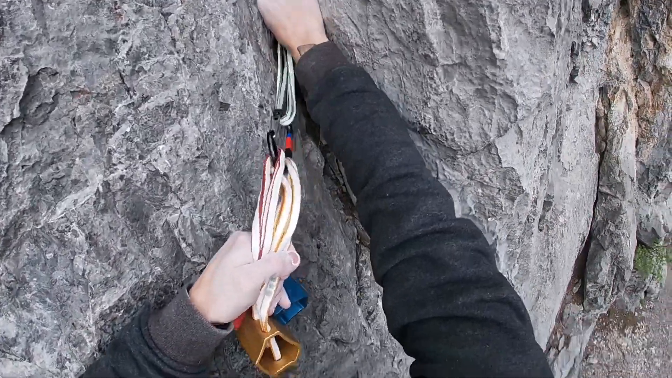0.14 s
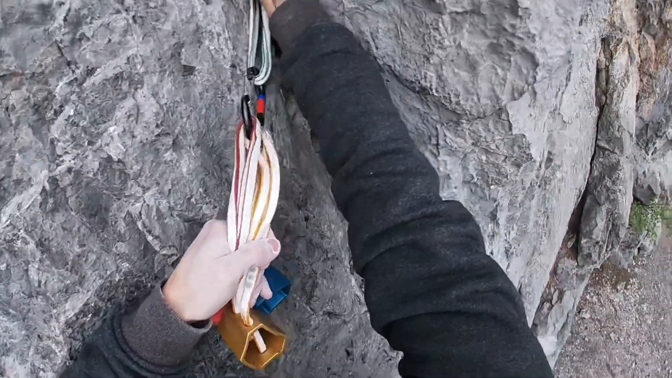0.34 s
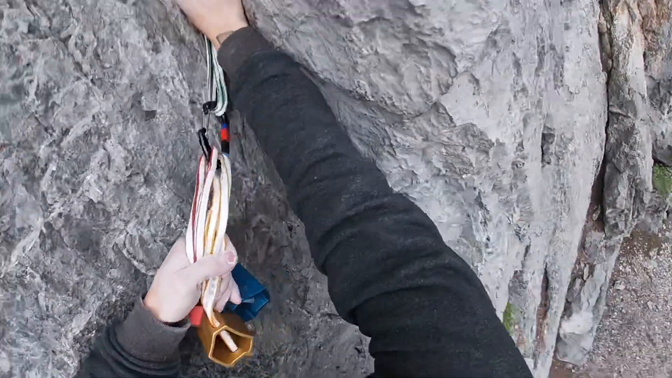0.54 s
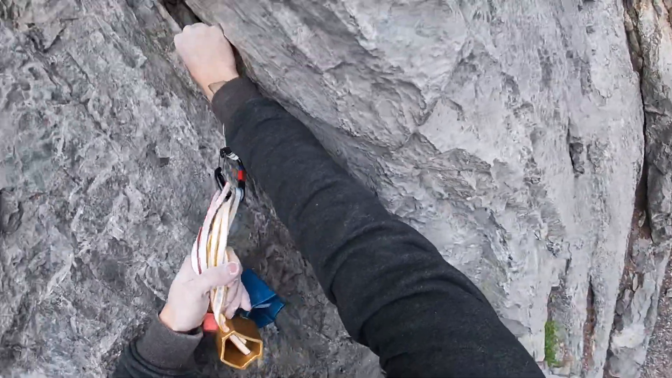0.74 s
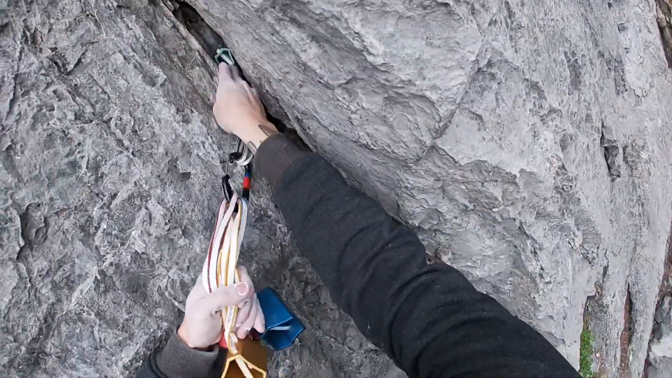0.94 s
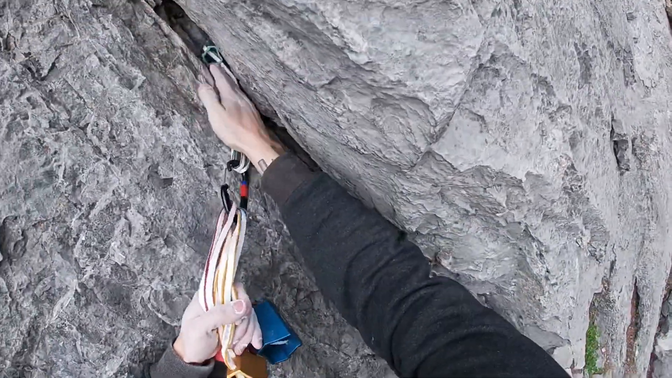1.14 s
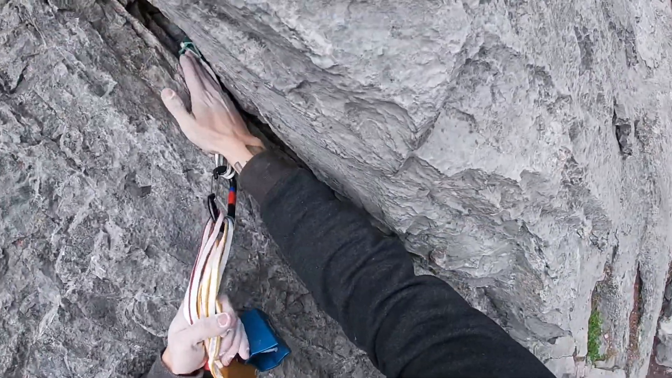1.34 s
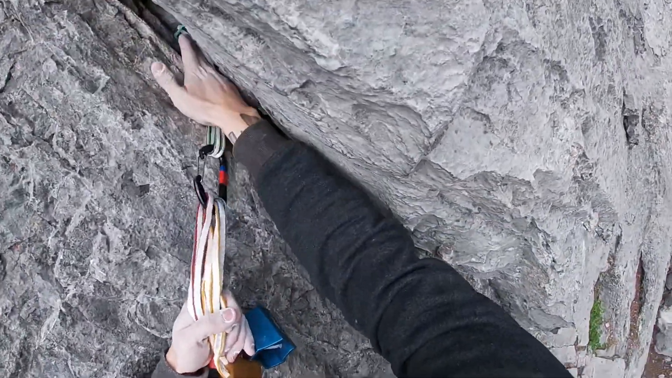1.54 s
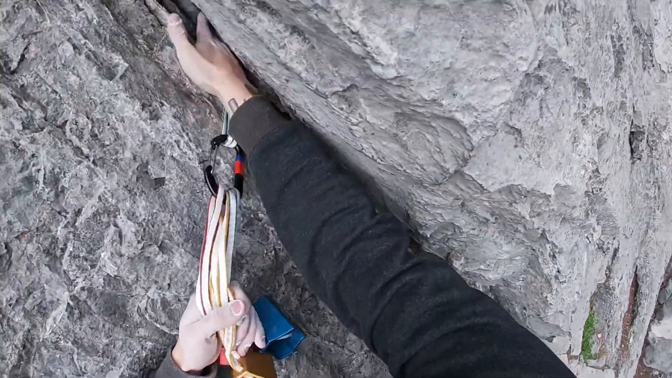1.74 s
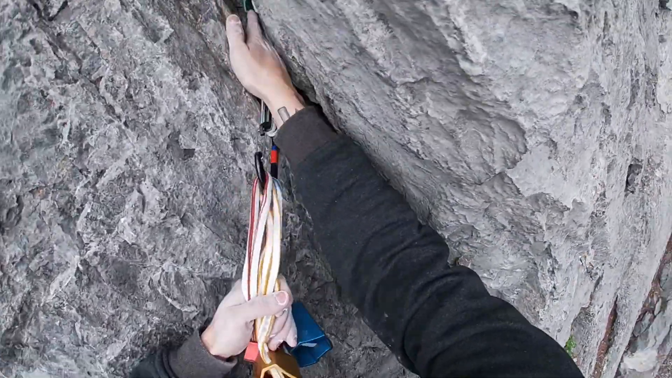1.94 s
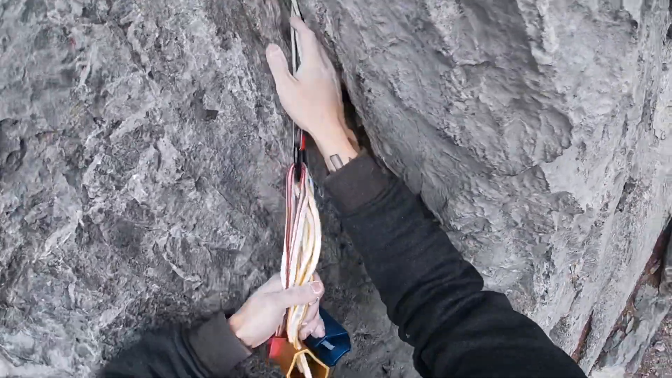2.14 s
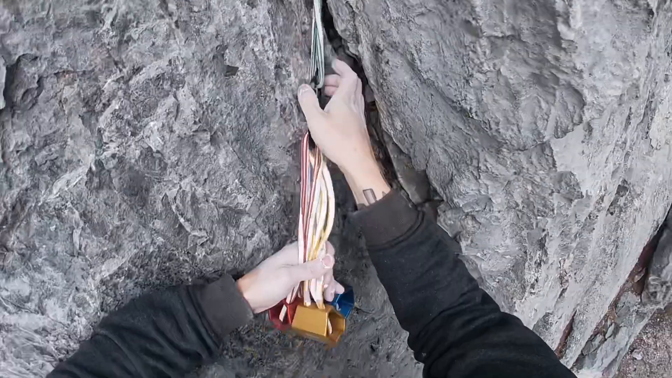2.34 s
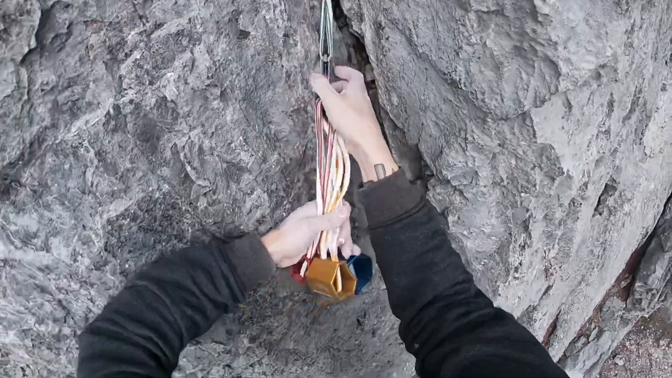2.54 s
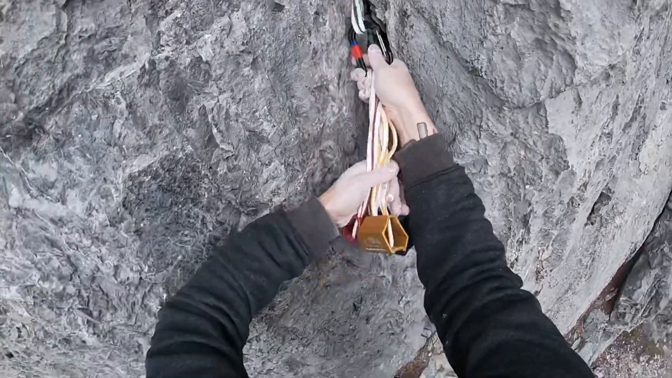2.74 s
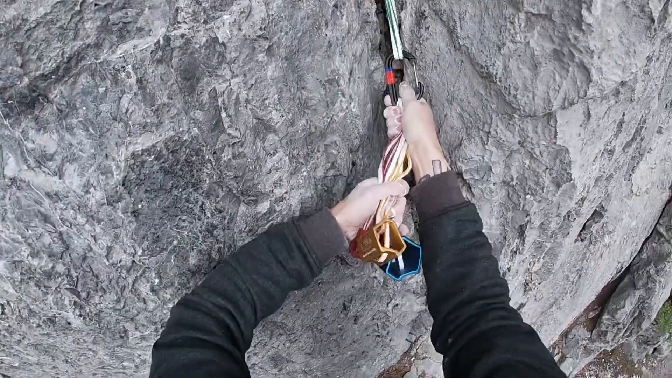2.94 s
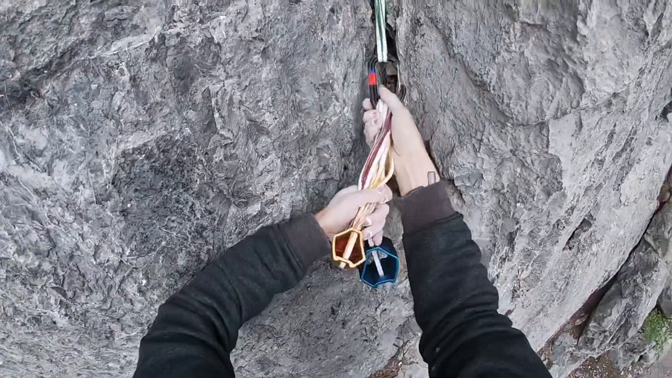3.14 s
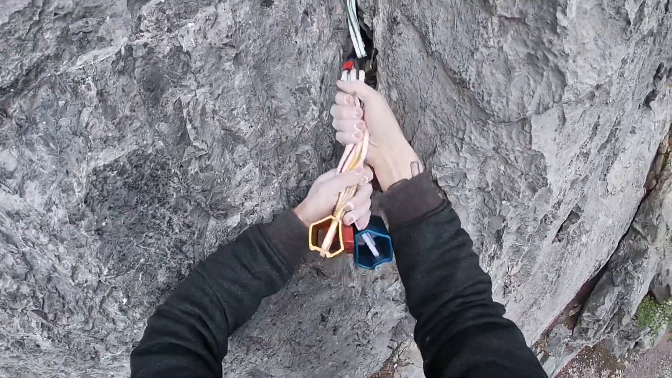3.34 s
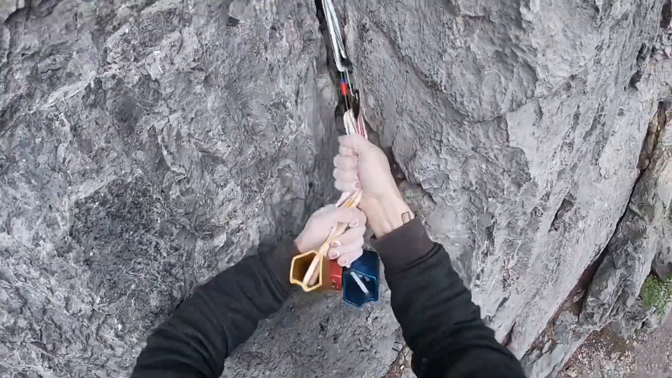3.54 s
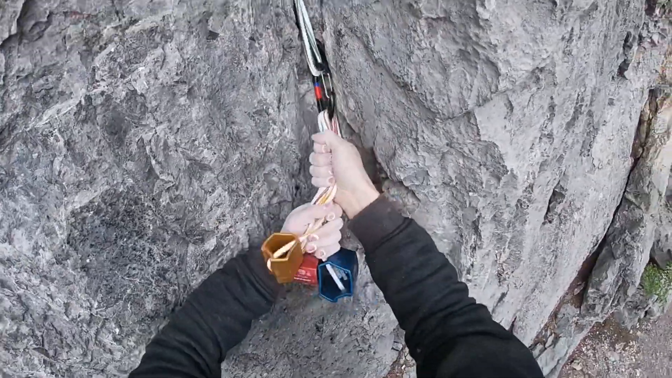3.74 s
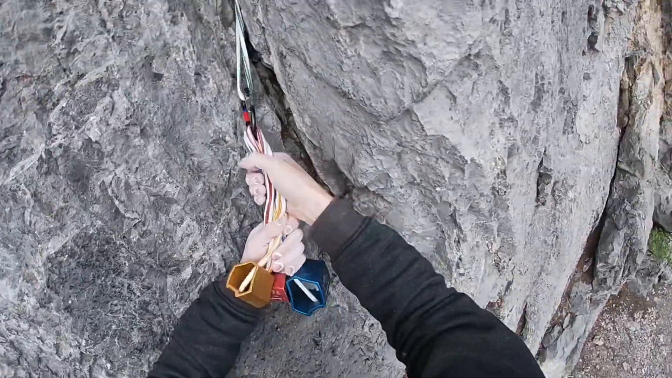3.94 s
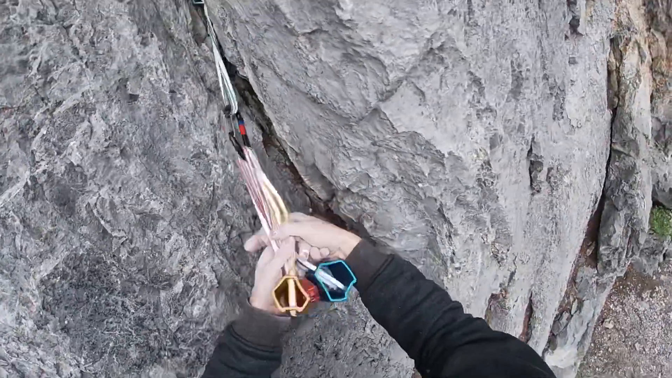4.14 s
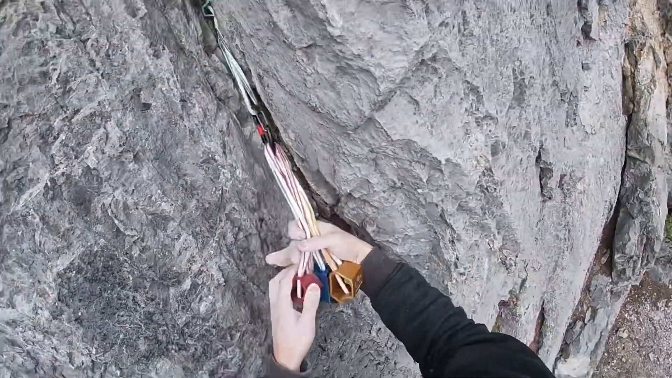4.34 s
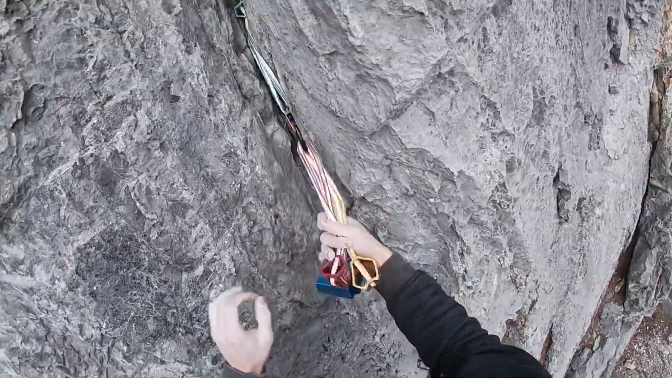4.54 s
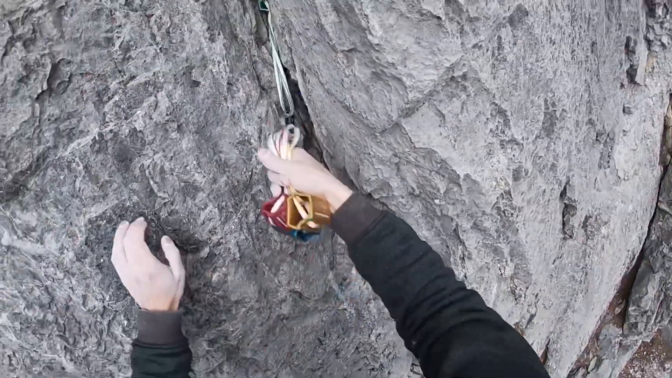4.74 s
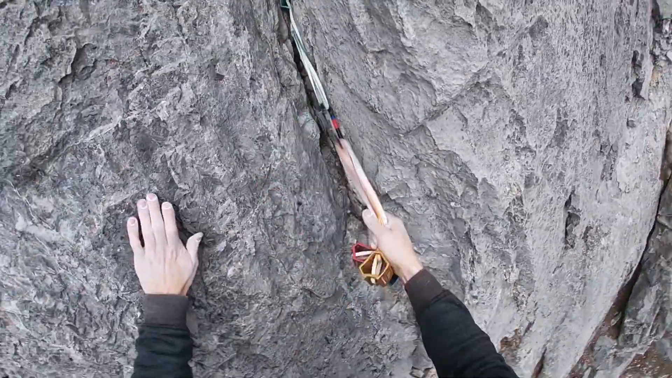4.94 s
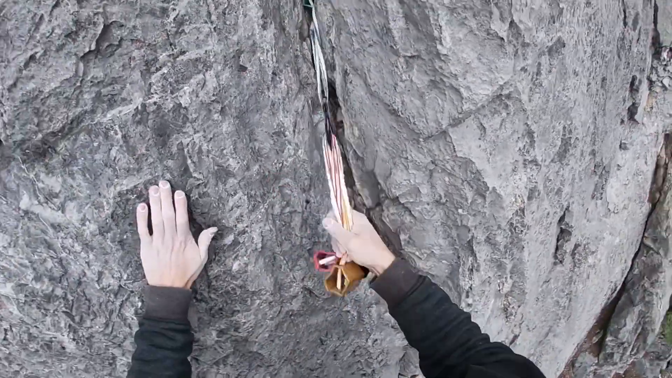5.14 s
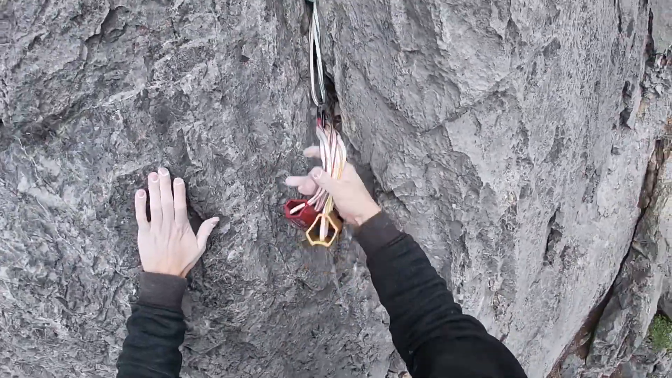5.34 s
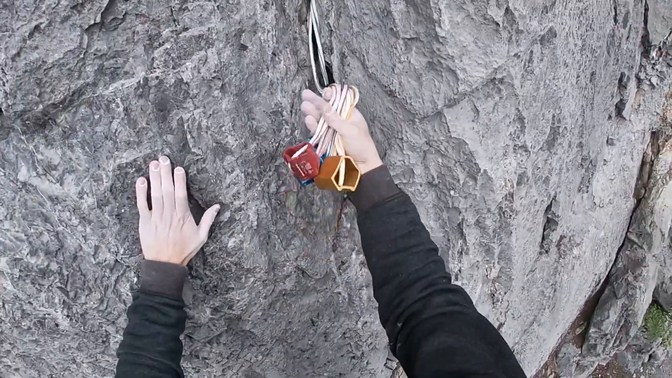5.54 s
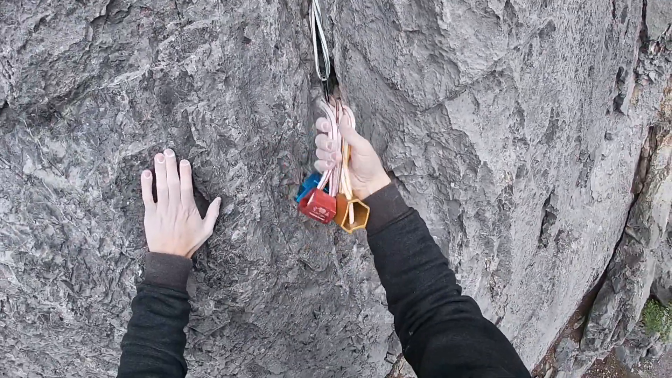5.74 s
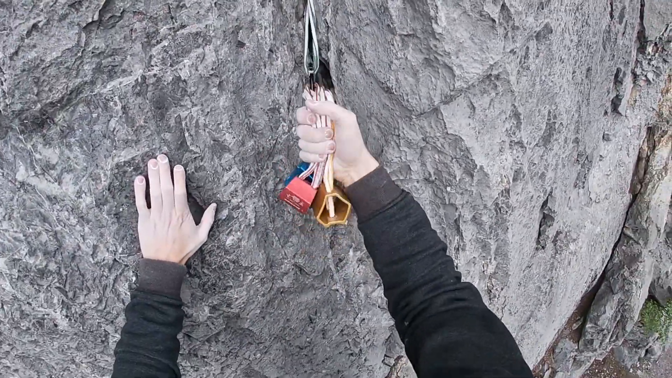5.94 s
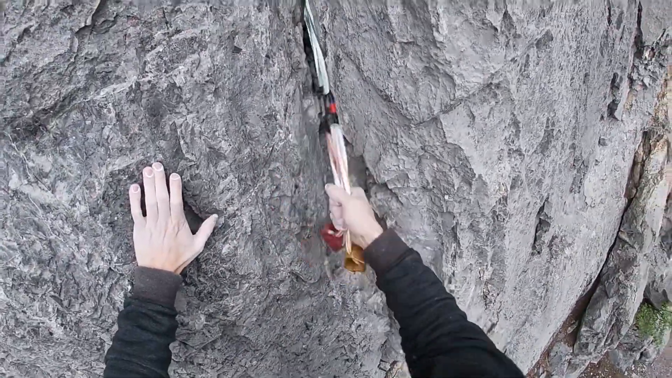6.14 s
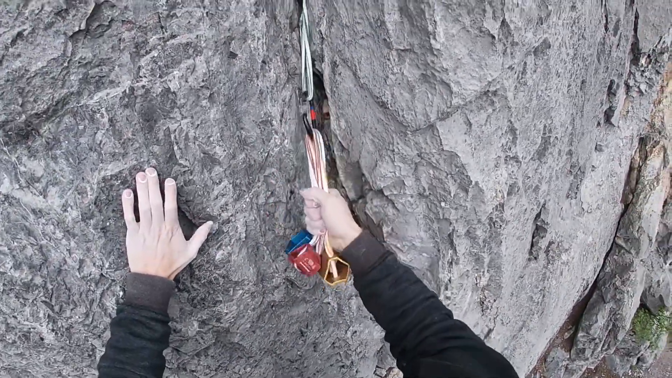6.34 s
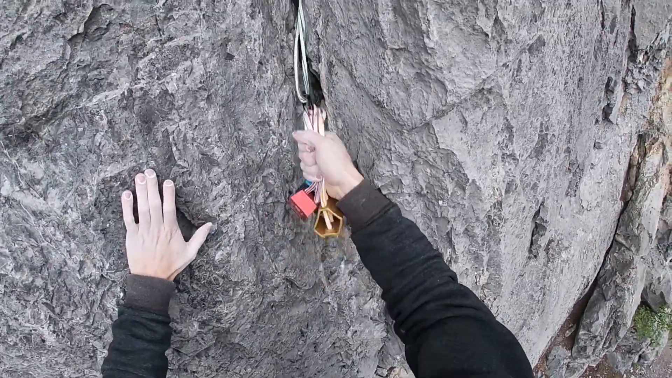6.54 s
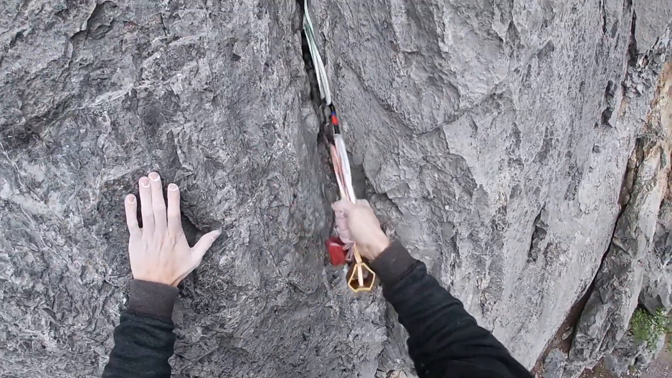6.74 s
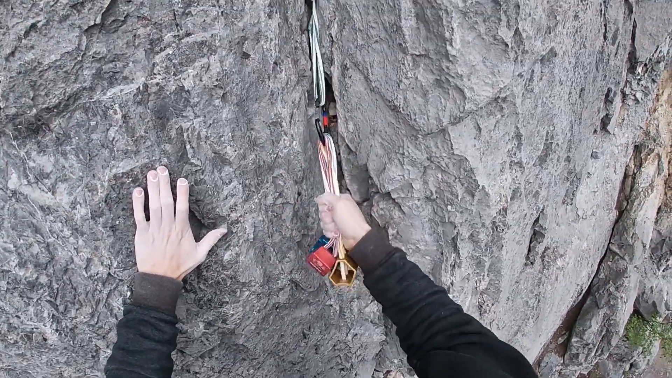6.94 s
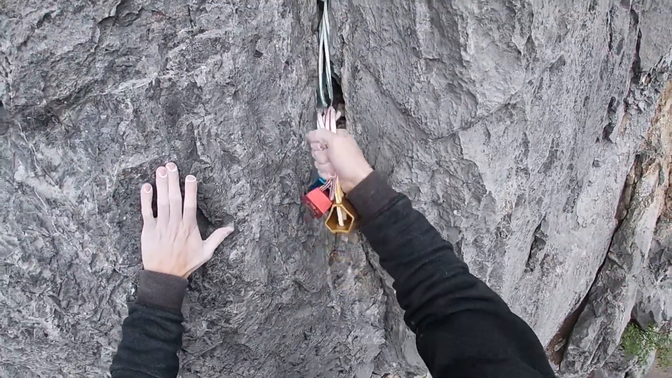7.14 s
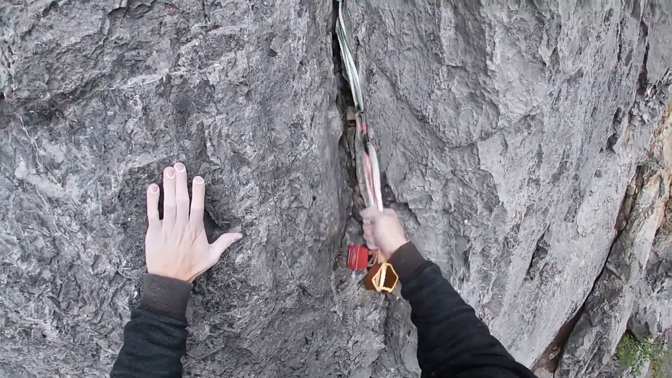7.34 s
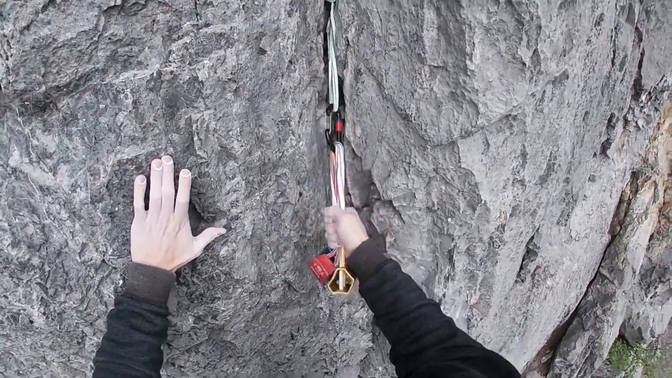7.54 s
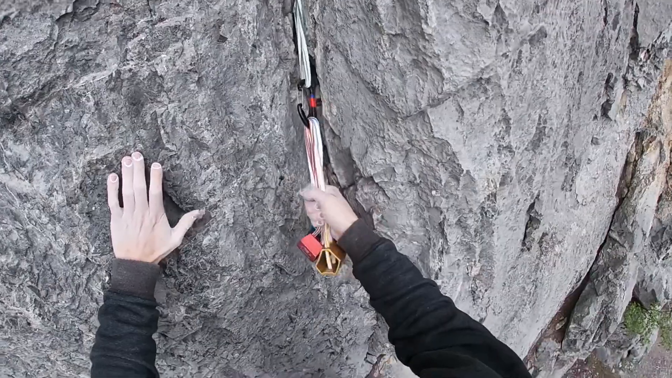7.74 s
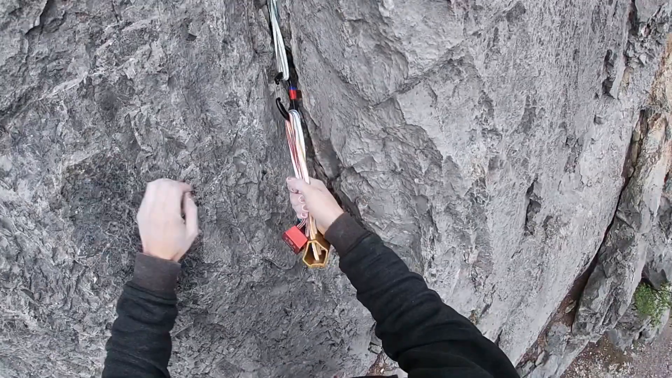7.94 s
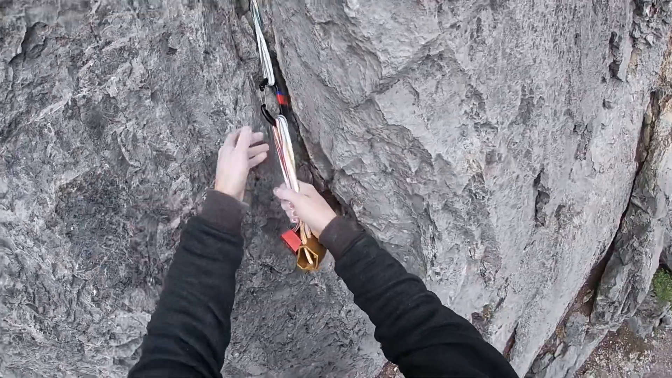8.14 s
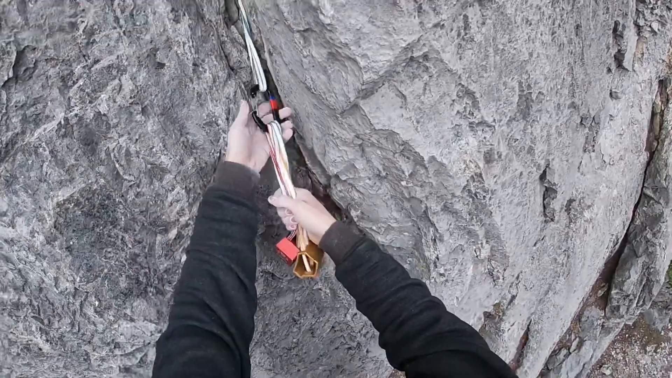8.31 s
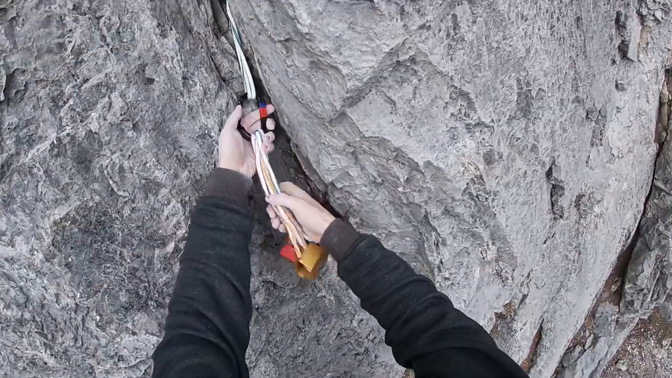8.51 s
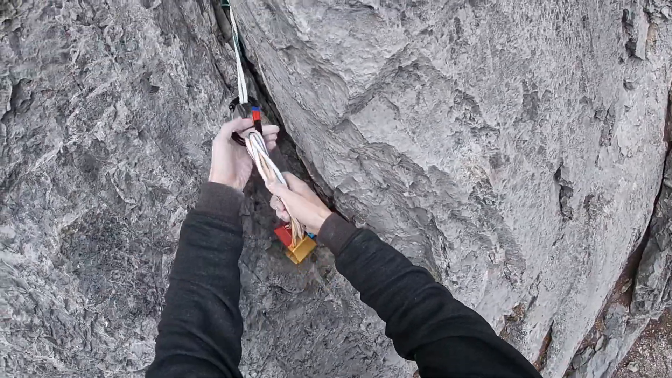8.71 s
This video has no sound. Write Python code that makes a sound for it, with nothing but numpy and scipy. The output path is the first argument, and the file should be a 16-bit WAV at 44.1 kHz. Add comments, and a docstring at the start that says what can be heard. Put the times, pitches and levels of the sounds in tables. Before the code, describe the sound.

Dry, close outdoor sound from a body-worn microphone beside rock. For about 1.8 seconds it is mostly quiet: low rumble, soft sleeve rustle, faint ticks, a sharper carabiner click near 0.7, a small thump at 1.3 and gritty scraping with dry clicks around 1.4-1.65. From 1.85 hollow aluminium nuts begin to clink, clattering more thickly at 2.2-2.5 over webbing rustle. Cloth thumps and a hard click come near 2.9-3.1; strong bright clanks follow at 3.5-3.65, then a dense jangling cluster peaks at 4.2-4.5. A sharp snap and thump land at 4.92, with lighter irregular clinks until 5.8. Three crisp tugs hit at about 6.1, 6.7 and 7.3, each a tight metallic crash with a bump and thinning tinkles. Near silence follows from 7.6 to 8.3, then soft sparse clinks, faint webbing rustle and rising rumble until about 9.

```python
"""First come a low rumble, a soft rustle of sleeves and a dry carabiner click; then metal clatters and rings.
A climber shifts three hollow aluminium hex nuts hung on slings from a carabiner, then tugs the slings three times.
Nuts and carabiner are modal resonators: contact bursts set off or drive banks of decaying sines.
Cloth, slings and rock are filtered noise under movement envelopes; a scrape is a train of stick-slip bursts.
A body-worn camera in the open air picks up movements as rumble and as soft, Gaussian-windowed thumps."""
import sys
import numpy as np
from scipy import signal
from scipy.fft import rfft, irfft
from scipy.io import wavfile
from scipy.ndimage import uniform_filter1d

SR = 44100
rng = np.random.default_rng(int(sys.argv[2]) if len(sys.argv) > 2 else 0)


def materialize(psi):
    """Save the field psi as 16-bit PCM at rate SR to the path in sys.argv[1].

    A 1-D psi becomes a single channel; in a 2-D psi each row is a channel.
    """
    bounded = np.clip(np.atleast_2d(psi).T, -1, 1)
    quanta = np.round(bounded * 32767).astype(np.int16)
    wavfile.write(sys.argv[1], SR, quanta)


N = 391166
TIME = np.arange(N) / SR
RING_TIME = np.arange(SR // 3) / SR


def undb(db):
    """Level law: decibels to amplitude gain."""
    return 10 ** (np.asarray(db) / 20)


def unit(x):
    """Power normalization: scale to rms 1."""
    return x / np.sqrt(np.mean(x ** 2))


def add(out, start_s, sound):
    """Superposition: mix a sound in from start_s, cut at the end of the scene."""
    i = max(int(start_s * SR), 0)
    out[i:i + len(sound)] += sound[:max(N - i, 0)]


def curves(table):
    """Linear interpolation: the columns of a (time, ...) table, sample by sample."""
    times, *columns = np.transpose(table)
    return [np.interp(TIME, times, column) for column in columns]


def log_interp(f, points):
    """Spectral envelope: levels [dB] interpolated along log frequency."""
    hz, db = np.transpose(points)
    return np.interp(np.log(f), np.log(hz), db)


def response(points, size=512):
    """Minimum phase: folding the cepstrum gives a causal filter of that colour, here of unit energy."""
    f = np.maximum(np.arange(size // 2 + 1) * SR / size, 1)
    cepstrum = irfft(np.log(undb(log_interp(f, points))))
    cepstrum[1:size // 2] *= 2
    cepstrum[size // 2 + 1:] = 0
    h = irfft(np.exp(rfft(cepstrum)))
    return h / np.linalg.norm(h)


def through(x, h):
    """Linear filtering: convolve x with an impulse response."""
    return signal.fftconvolve(x, h)[:len(x)]


def fade(t60):
    """Exponential damping: the envelope falls 60 dB in t60 seconds."""
    return np.exp(-np.log(1000) * RING_TIME / max(t60, 1e-3))


def walk(rate):
    """Low-passed randomness: twice-smoothed random steps, rate per second, rms 1."""
    k = int(SR / rate)
    steps = np.repeat(rng.standard_normal(N // k + 1), k)[:N]
    return unit(uniform_filter1d(uniform_filter1d(steps, k), k))


def grains(spread_db, size):
    """Granular friction: dense tiny contacts of very unequal strength, rms 1."""
    strength_db = spread_db * np.minimum(rng.exponential(size=size // 16 + 1), 6)
    strength = np.repeat(undb(strength_db), 16)[:size]  # one strength per 16 samples
    return unit(rng.standard_normal(size) * strength)


def touches(rate, spread_db=0.0):
    """Poisson-like impacts: impulses at random moments, rate per second on average, rms 1."""
    hits = rng.random(N) < rate / SR
    return unit(hits * undb(spread_db * rng.standard_normal(N)))


def gesture(start, hold, attack_s, release_s):
    """Exponential envelope of one movement: it swells up to start, holds and dies away."""
    early = np.maximum(start - TIME, 0)
    late = np.maximum(TIME - start - hold, 0)
    return np.exp(-np.minimum(early / attack_s + late / release_s, 20))


def gestures(rows, attack_s, release_s):
    """Superposition of movement envelopes from rows of (start [s], hold [s], level [dB])."""
    return sum(undb(db) * gesture(start, hold, attack_s, release_s) for start, hold, db in rows)


def contact(t60, first):
    """Contact force: one sharp touch of weight first, with the fading chatter of micro-bounces."""
    envelope = fade(t60)
    force = grains(4.2, len(envelope)) * envelope
    force /= np.linalg.norm(force)
    force[0] += first
    return force * np.linalg.norm(envelope) / np.linalg.norm(force)


def ring(modes, length, wall_db, overtone_db, detune=0.0055, scatter_db=6.0):
    """Modal synthesis: damped sines, weighted and detuned a little by each point of impact."""
    hz, db, t60 = np.transpose(modes)
    chance = rng.standard_normal((len(hz), 3))
    # the lowest modes flex the wide wall; hard contacts bring out the overtones
    db = db + wall_db * (hz < 2850) + overtone_db * (hz > 5500)
    # weak, high modes have many nodes and so depend most on the point of impact
    spread_db = scatter_db + 1.5 * (hz > 6600)
    gain = undb(db + spread_db * chance[:, 0]) * np.sign(chance[:, 1])
    t = RING_TIME.astype(np.float32)
    omega = (2 * np.pi * hz * (1 + detune * chance[:, 2])).astype(np.float32)
    loss = (np.log(1000) / (t60 * max(length, .2))).astype(np.float32)
    return gain @ (np.sin(np.outer(omega, t)) * np.exp(-np.outer(loss, t)))


def rubbed(force, modes, length, overtone_db):
    """Driven resonance: a running contact force passes through a unit-energy modal response."""
    metal = ring(modes, length, 0, overtone_db)
    return through(force, metal / np.linalg.norm(metal))


# Overall stir of the climber, also used by rustle():
# (time [s], sleeve rustle level [dB], rumble level [dB]), before trims
STIR_CURVES = [(0.0, -55.5, -45), (0.68, -58.5, -46), (0.81, -47, -46.5), (1.16, -63, -41),
               (1.55, -59.5, -35), (1.75, -56, -36), (2.74, -59, -47), (3.2, -59.5, -36.5),
               (3.65, -67, -42), (4.38, -56, -47), (4.75, -70, -41.5), (5.25, -77, -42),
               (5.46, -54.5, -54.5), (6.1, -68, -51.5), (6.9, -73.5, -49.5), (7.7, -71.5, -61),
               (8.3, -74.5, -49.5), (8.87, -55.5, -35)]
# Shifts of the chest that rock the camera:
# (start [s], hold [s], sway level [dB], cloth rubbing level [dB]), before trims
CHEST_SHIFTS = [(1.251, 0.2, -27.5, -39.5), (1.744, 0.14, -35.5, -49.5), (1.965, 0.014, -23, -37),
                (2.325, 0.067, -34.5, -53), (2.525, 0.25, -30, -44), (2.673, 0.34, -24.5, -35),
                (2.78, 0.17, -29, -29), (3.093, 0.03, -20.5, -31), (3.37, 0.035, -30, -45.5),
                (3.479, 0.087, -35.5, -47.5), (4.544, 0.026, -26.5, -39.5), (4.636, 0.033, -31.5, -49),
                (4.945, 0.083, -31, -43), (5.122, 0.13, -29.5, -43), (5.703, .04, -39.5, -40),
                (5.825, 0.033, -40.5, -45.5), (6.096, 0.014, -29, -24.5), (6.148, .17, -42.5, -53.5),
                (6.678, 0.054, -28.5, -31), (6.753, 0.14, -37.5, -42.5), (7.303, 0.0049, -24.5, -24.5),
                (7.366, 0.16, -48, -53.5), (7.971, 0.11, -64, -55.5), (8.445, 0.12, -29.5, -39),
                (8.634, 0.27, -50, -48)]
SHIFT_ATTACK_S, SHIFT_RELEASE_S = 0.018, 0.016
# Jolts through the body: (centre time [s], level [dB], frequency [Hz], Gaussian 1/e half-length [s])
BODY_JOLTS = [(1.26, -16.5, 59.5, 0.0027), (2.808, -14, 71, 0.0065), (2.876, -17, 130, 0.0048),
              (3.09, -20, 163, 0.0045), (4.921, -17, 800, 0.00097), (4.922, -9, 340, 0.00061),
              (4.946, -14, 90, 0.0027), (5.183, -15, 110, 0.0018), (6.101, -35.5, 134, .005),
              (6.693, -28.5, 130, .005), (6.712, -23, 188, 0.006), (7.315, -9.5, 166.3, 0.0052)]
# Colours of swaying and of cloth on the housing: (frequency [Hz], relative level [dB])
SWAY_COLOUR = [(10, -1), (25, 6.5), (50, 5.5), (90, -0.5), (140, -8.5), (300, -59.5), (1500, -91.5),
               (8000, -120)]
RUB_COLOUR = [(50, -20), (110, 4), (190, 3.5), (300, -10.5), (500, -23), (1000, -39), (3000, -58),
              (10000, -100)]


def body(sway_db=-2, rub_db=-1, idle_rub_db=-16, uneven_db=1.5):
    """Structure-borne sound: the camera sways on the jacket, cloth rubs its housing and jolts thump."""
    _, rumble_db = curves(STIR_CURVES)
    idle = undb(rumble_db + uneven_db * walk(12))
    sway, rub = idle, idle * undb(idle_rub_db)
    for start, hold, shift_sway_db, shift_rub_db in CHEST_SHIFTS:
        shift = gesture(start, hold, SHIFT_ATTACK_S, SHIFT_RELEASE_S)
        # the strongest movement of the moment sets the level
        sway = np.maximum(sway, undb(shift_sway_db) * shift)
        rub = np.maximum(rub, undb(shift_rub_db) * shift)
    out = undb(sway_db) * sway * through(rng.standard_normal(N), response(SWAY_COLOUR, size=8192))
    out += undb(rub_db) * rub * through(grains(3.8, N), response(RUB_COLOUR, size=4096))
    t = np.arange(-SR // 20, SR // 20) / SR
    for centre, db, hz, length in BODY_JOLTS:
        thump = -undb(db) * np.sin(2 * np.pi * hz * t) * np.exp(-(t / length) ** 2)
        add(out, centre + t[0], thump)
    return out


def swish(x, depth_db, count=4):
    """Band-wise modulation: as the grip changes, the bands below 5.6 kHz swell and fade separately."""
    out = np.zeros(N)
    for hz in 700 * 2 ** np.arange(count):  # one band below 700 Hz, then octaves
        low = signal.sosfiltfilt(signal.butter(2, hz, fs=SR, output="sos"), x)
        out += low * undb(depth_db * walk(14))
        x = x - low
    return out + x


# The slings run through the hand: (start [s], hold [s], level [dB] before trims)
SLING_STROKES = [(1.42, .05, -76), (1.85, 0.25, -51), (2.2, 0.089, -47), (2.44, 0.13, -42), (2.6, .48, -46),
                 (3.2, 0.27, -61), (3.82, 0.17, -55.5), (4.1, .08, -54), (4.22, 0.28, -47),
                 (4.55, 0.17, -60), (4.82, 0.07, -48.5), (5.1, .18, -56), (5.37, 0.089, -48.5),
                 (5.76, 0.035, -47), (6.03, .15, -57), (6.66, 0.13, -68), (8.5, 0.47, -59.5)]
STROKE_ATTACK_S, STROKE_RELEASE_S = 0.042, 0.014
# Colours of sleeve cloth and sling webbing: (frequency [Hz], relative level [dB])
SLEEVE_COLOUR = [(150, 1.5), (400, 3.5), (800, 4), (1200, 1.5), (2000, -3), (4000, -10.5), (7000, -13),
                 (10000, -28), (15000, -62.5)]
WEBBING_COLOUR = [(600, -26.5), (1100, -7.5), (1500, 0.5), (2000, -3), (3000, -12), (4500, -8.5),
                  (7000, -21), (14000, -51)]


def rustle(sleeve_db=0, webbing_db=-5, catch_db=-3, catch_rate=55, fits_db=3.0, swish_db=1.5):
    """Textile friction: sleeves and slings rub in fits and starts, heard as modulated grainy noise."""
    sleeve_level_db, _ = curves(STIR_CURVES)
    fits = fits_db * walk(35)
    sleeve_gain = undb(sleeve_level_db + sleeve_db + fits)
    out = sleeve_gain * through(grains(2.5, N), response(SLEEVE_COLOUR))
    # the weave catches and lets go, each time with a small crunch
    crunches = through(touches(catch_rate), fade(0.011))
    catches = unit(crunches * rng.standard_normal(N))
    weave = undb(webbing_db + fits) * grains(1.6, N) + undb(catch_db) * catches
    strokes = gestures(SLING_STROKES, STROKE_ATTACK_S, STROKE_RELEASE_S)
    out += strokes * through(weave, response(WEBBING_COLOUR))
    return swish(out, swish_db)


# Hands and gear drag over the rock, pressing harder as they go:
# (start [s], length [s], mid-drag level [dB] before the rock filter, mean slip rate [1/s])
ROCK_DRAGS = [(1.364, 0.21, -41, 105), (2.895, 0.014, -23, 620), (3.369, .11, -47, 150)]
SCRAPE_SWELL_DB, SCRAPE_EDGE_S = 9, 0.0034
# Colour of the grit: (frequency [Hz], relative level [dB])
ROCK_COLOUR = [(400, -4), (900, 3.5), (1500, 2), (2200, 4.5), (3000, -8), (4000, -17), (7000, -35.5),
               (10000, -24.5), (12000, -48.5), (16000, -37)]


def scrape(uneven_db=5.0):
    """Stick-slip: skin and gear on rough limestone let go in bursts of gritty noise."""
    out = np.zeros(N)
    pace = np.exp(0.17 * walk(90))
    grip = undb(uneven_db * walk(120))
    for start, length, db, rate in ROCK_DRAGS:
        # each whole step of the accumulated phase is one slip
        phase = np.cumsum(rate * pace) / SR
        slips = np.diff(np.floor(phase), prepend=0) * grip
        progress = np.clip((TIME - start) / length, 0, 1)
        pressure_db = db + SCRAPE_SWELL_DB * (progress - .5)
        edges = gesture(start, length, SCRAPE_EDGE_S, SCRAPE_EDGE_S)
        out += undb(pressure_db) * edges * unit(through(slips, fade(0.03)))
    return through(out * rng.standard_normal(N), response(ROCK_COLOUR))


# Modes of each nut, largest nut first; also used by jangle() and clinks():
# (frequency [Hz], relative level [dB], t60 [s] at length factor 1)
GOLD_MODES = [(2540, -11.5, .025), (2639, -7, 0.059), (2700, 1, 0.027), (2893, -20.5, 0.065),
              (3093, -1.5, 0.062), (2900, -30, 0.11), (3214, -3, 0.017), (3380, -15.5, .025),
              (7355, -18, 0.055), (6760, -23.5, .08), (7500, -30, 0.1), (8960, -38, .08),
              (9230, -32.5, 0.084), (11750, -26.5, 0.04), (13990, -50.5, .08)]
BLUE_MODES = [(3770, -5, 0.024), (4081, 1.5, 0.065), (4134, -12, 0.13), (4380, -22.5, 0.21),
              (6380, -21.5, 0.13), (6140, -20, 0.024), (7370, -13.5, 0.056), (8100, -24, 0.1),
              (10800, -43, .14), (12540, -39, .10), (13600, -42.5, .07)]
RED_MODES = [(4758, -1, 0.081), (4900, -24.5, .06), (4895, -14.5, 0.13), (5260, -17.5, 0.032),
             (6220, -3, 0.08), (6396, -22, .07), (10600, -24, 0.036), (10560, -30.5, 0.037),
             (12330, -30.5, .10), (13060, -41.5, .08)]
NUTS = (GOLD_MODES, BLUE_MODES, RED_MODES)
# Nuts slide over each other as the slings tighten:
# (end [s], exponential rise time [s], gold, blue and red force levels [dB])
NUT_SLIDES = [(2.193, 0.039, -40, -38, -41), (3.487, 0.043, -35, -52, -76), (4.22, 0.11, -41, -67.5, -62.5),
              (4.34, 0.031, -37.5, -36, -27.5), (5.439, 0.14, -46, -48.5, -56),
              (5.771, 0.015, -22, -33.5, -39.5), (6.082, 0.0073, -26, -18, -16),
              (6.694, 0.0082, -35.5, -19.5, -18.5), (7.305, 0.0074, -23.5, -17, -39),
              (8.598, 0.072, -38.5, -43.5, -54.5)]
# Colour of a hard contact, also used by clinks(): (frequency [Hz], relative level [dB])
CRACK_COLOUR = [(1500, -15.5), (3300, 18), (5400, 12.5), (7300, 12.5), (8900, -6), (11500, -11),
                (13000, -12.5), (14500, -38.5), (16000, -63.5)]


def slides(scrape_db=-13):
    """Frictional excitation: pressure swells between the nuts and keeps their modes singing."""
    pressure = np.zeros((3, N))
    for end, rise, *nut_db in NUT_SLIDES:
        before_end = np.arange(int(end * SR))[::-1] / SR
        swell = np.exp(-before_end / rise)
        pressure[:, :len(swell)] += np.outer(undb(nut_db), swell)
    friction = pressure * grains(1.7, N)
    metal = sum(rubbed(force, modes, length=0.52, overtone_db=-14.5) for force, modes in zip(friction, NUTS))
    return metal + undb(scrape_db) * through(friction.sum(axis=0), response(CRACK_COLOUR))


# Spells in which the swinging nuts brush each other: (start [s], hold [s], level [dB] before trims)
JANGLE_SPELLS = [(0.06, 0.52, -91), (0.78, 0.092, -53.5), (1.1, 0.14, -68), (2.19, 0.1, -47),
                 (2.39, 0.18, -70), (2.72, 0.56, -56), (3.5, 0.21, -55), (4.26, 0.24, -44.5),
                 (4.52, 0.7, -57.5), (5.15, .28, -74.5), (5.56, 0.03, -53.5), (6.12, 0.16, -46),
                 (6.72, 0.18, -58), (7.38, 0.087, -48), (8.4, 0.24, -56.5)]
JANGLE_ATTACK_S, JANGLE_RELEASE_S = 0.008, 0.041
# Colours of brushing grit, and of a knock (also in clicks() and clinks()):
# (frequency [Hz], relative level [dB])
GRIT_COLOUR = [(1500, -20.5), (3200, 17), (4500, 0.5), (7000, 1.5), (8500, -4.5), (10500, -14.5),
               (12500, -20.5), (15000, -51)]
KNOCK_COLOUR = [(150, -23.5), (400, -5.5), (900, -9.5), (1500, 6.5), (2200, 4.5), (3200, 3), (4500, -4.5),
                (7000, -38), (14000, -57)]


def jangle(grit_db=-10, ring_db=1, tap_db=-6, rate=75, fits_db=4.0):
    """Random impact excitation: light touches of the nuts give taps, rings and some grit."""
    swing = gestures(JANGLE_SPELLS, JANGLE_ATTACK_S, JANGLE_RELEASE_S)
    out = swing * undb(grit_db + fits_db * walk(52)) * through(grains(3.0, N), response(GRIT_COLOUR))
    for modes in NUTS:
        force = swing * touches(rate / 3) / np.sqrt(3)  # the nuts share the touches and their power
        out += undb(ring_db) * rubbed(force, modes, length=0.72, overtone_db=7)
        out += undb(tap_db) * through(force, response(KNOCK_COLOUR))
    return out


# Dry clicks of carabiner and rock: (time [s], knock, ring and snap levels [dB] before trims)
CLICK_EVENTS = [(0.0539, -48, -58, -28.5), (0.076, -44, -45, -56), (0.108, -44.5, -58, -61),
                (0.248, -47, -69, -76), (0.272, -35.5, -49, -58), (0.7192, -23, -37, -29),
                (0.8525, -46, -62, -53), (0.886, -43, -54, -44), (0.996, -41.5, -67, -57),
                (1.1146, -50, -66, -55), (1.517, -24.5, -29, -67), (1.407, -44, -62, -62),
                (1.5307, -27, -37, -57), (1.5922, -26.5, -39, -56), (1.6301, -31.5, -16.5, -30),
                (1.644, -26, -30.5, -37), (1.8515, -46, -19.5, -55), (2.901, -22, -21, -32),
                (2.9085, -18.5, -18.5, -23), (3.188, -29, -29.5, -27), (3.488, -41, -29, -33),
                (3.6294, -27, -21, -40), (3.6932, -30.5, -47, -70), (4.2574, -16, -30, -51),
                (4.8246, -49, -43, -29), (4.921, -15, -31, -20), (4.9413, -45, -24.5, -9.5),
                (7.973, -54.5, -70, -78)]
CLICK_T60_S = 0.018
# Modes of the carabiner: (frequency [Hz], relative level [dB], t60 [s] at length factor 1)
CARABINER_MODES = [(3160, -14.5, 0.0076), (3458, 1, 0.053), (4160, 2.5, 0.016), (4120, -5.5, .015),
                   (5850, -5.5, 0.038), (6590, -2.5, 0.01547), (8800, -31.5, 0.021), (9920, -5.5, 0.065),
                   (10480, -49, 0.012)]
# Colour of a sharp snap: (frequency [Hz], relative level [dB])
SNAP_COLOUR = [(2500, -5.5), (5000, 8), (6700, 2), (8200, -7.5), (10200, -16.5), (12500, -26.5),
               (16000, -33)]


def clicks(knock_db=1, ring_db=0, snap_db=0, overtone_db=-1):
    """Heavy damping: the solid carabiner is damped by its slings, so its modes die quickly."""
    rings, knocks, snaps = np.zeros((3, N))
    for s, knock, body_ring, snap in CLICK_EVENTS:
        # a sharp snap brings out the overtones, up to a limit
        brightness = min(snap - body_ring, 0) / 2 + overtone_db
        metal = ring(CARABINER_MODES, 0.46, 0, brightness, detune=0.021)
        add(rings, s, undb(body_ring + ring_db) * metal)
        add(knocks, s, undb(knock + knock_db) * contact(CLICK_T60_S, first=1.0))
        add(snaps, s, undb(snap + snap_db) * contact(CLICK_T60_S, first=0.3))
    return rings + through(knocks, response(KNOCK_COLOUR)) + through(snaps, response(SNAP_COLOUR))


# Clear knocks of nut on nut: (time [s], knock level [dB], gold, blue and red ring levels [dB],
# hardness [dB], ring length factor [1], floored at 0.2), levels before trims
CLINK_EVENTS = [(0.296, -80, -54, -58, -55.5, 18.5, 1.5), (0.3406, -49, -59, -47, -44, 1, .9),
                (0.633, -73, -87, -55.5, -92, 16, 4.5), (0.7804, -38, -41, -51, -40, 2.5, 1.7),
                (1.8517, -32, -24, -37, -50, -14, .25), (1.876, -42, -42, -45, -63, -4, .35),
                (1.9058, -36, -40, -41, -49, 9, 2.2), (1.9445, -42.5, -51, -63, -63, 18.5, 0.88),
                (2.06, -37, -47, -53, -34, 12, .4), (2.151, -36.5, -42, -59, -49, 11, 1.5),
                (2.1934, -27, -20, -24, -20, -0.5, .9), (2.203, -41, -28, -32, -17.5, -7, 1.8),
                (2.2161, -34, -15, -18, -42, 7, .5), (2.271, -39, -42, -48, -46, -6, 2.5),
                (2.3825, -34, -14.5, -22, -15.5, -9, .6), (2.3949, -36, -12.5, -30, -14.5, 0.5, .85),
                (2.4132, -41, -38, -25, -38, -4, 0.33), (2.445, -63, -16.5, -35, -22.5, -4, 1),
                (2.508, -36.5, -21.5, -22, -21, -7, .6), (2.4754, -33, -39, -34, -26, -0.5, 1.3),
                (2.531, -44, -31, -35.5, -37, -1, 1.45), (2.6586, -33, -48, -34, -33.5, 8, 1.35),
                (2.7174, -38.5, -22.5, -29.5, -33, -6, .6), (2.8186, -39, -25.5, -43, -63, -1, .5),
                (2.928, -29, -50, -37, -31.5, 4.5, 3), (2.96, -36, -14, -27, -30, -3.5, .45),
                (3.0036, -47.5, -53, -42, -42.5, 10, 1.9), (3.0767, -29.5, -30, -34, -20.5, -5, .9),
                (3.1275, -33.5, -9, -30, -23.5, -5, .3), (3.2452, -37, -61, -37, -39, 8, 1.1),
                (3.375, -36.5, -36.5, -42, -44.5, 2, 2.9), (3.4418, -45, -51, -55, -64, 23.5, 1.2),
                (3.4882, -21, -1, -17, -23, 4.5, .45), (3.52, -37.5, -33, -31, -17.5, 4.5, 1),
                (3.5438, -28, -44, -27, -15.5, -1, 1.3), (3.5552, -48, -39, -32.5, -27, -17, 2.7),
                (3.5675, -31, -16.5, -30, -39, 5.5, .45), (3.6277, -34.5, -1.5, -25, -31, 3, .35),
                (3.7181, -45.5, -24, -23.5, -38, -6, .45), (3.7748, -33.5, -22, -20, -11, -6, 1.9),
                (3.7893, -30.5, -27, -34, -9.5, -6, .65), (3.8345, -33.5, -25.5, -24, -26.5, -3, 1.35),
                (3.9126, -40, -21, -43, -49, -5.5, .75), (4.0271, -30.5, -42, -19.5, -19.5, 1, 1.1),
                (4.067, -37, -14.5, -14, -45, -2, 1), (4.133, -52.5, -29, -45, -55, -9, 3),
                (4.161, -42.5, -22, -40.5, -46, -13, 2.9), (4.2205, -37.5, -6.5, -13, -43.5, -6, .8),
                (4.243, -36, -21, -42.5, -40, 7, 0.77), (4.258, -37.5, -13.5, -37, -14.5, 1.5, 1.45),
                (4.283, -28, -19, -21, -21.5, -0.5, 2.2), (4.312, -43, -36, -23, -27, -1, 1.1),
                (4.3405, -30, -10.5, -15.5, -16, 2, 2.1), (4.3622, -55, -10, -25.5, -33.5, -16, 1.8),
                (4.4026, -56.5, -15.5, -24, -26.5, 3, 1), (4.421, -43, -15, -21, -41, -5, 0.77),
                (4.4349, -39, -7.5, -16.5, -31, 3, .5), (4.4538, -36, -22, -16, -34, 5.5, 0.45),
                (4.4645, -34, -11, -14, -13, -10, .45), (4.5075, -34, -38.5, -46, -52, 15.5, 2.2),
                (4.6005, -41, -44, -37, -26.5, 8.5, .6), (4.803, -35, -53, -39, -43, 12.5, 1.9),
                (4.8526, -36.5, -38, -12, -22, -3.5, .25), (4.9037, -26.5, -43, -13, -11, 2, .5),
                (4.9268, -42, -49.5, -18, -20.5, 9.5, .85), (4.9836, -35.5, -23.5, -28, -23.5, 4.5, 0.95),
                (5.062, -37, -22, -45, -24.5, -6.5, .35), (5.1384, -33, -35, -23, -10.5, -10.5, 0.37),
                (5.1447, -32, -13.5, -14.5, -30, 0.5, 0.48), (5.1667, -34, -24, -24.5, -48, 4, .8),
                (5.1919, -42, -31, -50, -25.5, -2, 0.34), (5.2982, -39.5, -24, -34, -40, -15, .75),
                (5.3622, -35, -23.5, -30, -40, -0.5, .7), (5.373, -38.5, -28, -33, -39, -4, 1.7),
                (5.4654, -31.5, -14.5, -30, -41, -9, .9), (5.5034, -32.5, -15, -29, -18.5, -6.5, .8),
                (5.5601, -30.5, -6, -36, -54, -15, .6), (5.5802, -31.5, -19, -57, -62, -12, 1.6),
                (5.607, -38, -25.5, -56, -69, -14.5, 1.34), (5.7157, -38.5, -19, -48, -29.5, -9, 1.6),
                (5.743, -34.5, -32, -22.5, -24, -0.5, 1.7), (5.7555, -60.5, -9.5, -24, -15, -25, .75),
                (5.7707, -39, -13.5, -15.5, -9.5, -4, .6), (5.8224, -38, -21, -48, -57.5, -13, 1.7),
                (5.8377, -45, -28, -45, -51.5, -7, 1.8), (5.9163, -49.5, -37, -59, -50.5, -10.5, .9),
                (6.0798, -22, -31.5, -20, -13, -6, 1.2), (6.0914, -29, -10, -7, -36.5, -0.5, 1),
                (6.1, -35, -10, -22, -41, 5, 1.4), (6.1249, -61.5, -10, -40, -27, -3, 1.7),
                (6.1462, -38, -25, -44, -31, 2, 0.87), (6.2058, -57, -19.5, -30, -33, -6, 1.4),
                (6.238, -55, -25, -29, -56, -1.5, 2.4), (6.2631, -50, -20, -26, -36, -13, 1.9),
                (6.31, -40.5, -33, -31, -43, 3, 2.6), (6.4025, -56, -35, -36, -65.5, -8, 3.5),
                (6.441, -45.5, -17.5, -23.5, -45, -1, .9), (6.5352, -54.5, -28, -38.5, -61.5, -1, 2.1),
                (6.5969, -54.5, -26.5, -41.5, -64, -7, 2.3), (6.617, -48, -41.5, -43, -60.5, 3, 1.1),
                (6.688, -24.5, -26, -9, -44, -1, 1.3), (6.704, -33, -8.5, -21, -32, 3, 1.9),
                (6.7752, -38, -18, -22, -39, -3, .9), (6.7894, -45, -19, -28, -15.5, -7, .9),
                (6.8512, -45, -25.5, -24.5, -45, 4, 1.2), (6.9214, -53.5, -35.5, -39, -63, -3, 1.7),
                (6.9659, -59, -37.5, -42.5, -58, 5.5, 1.3), (7.003, -61, -48.5, -54, -63, 6, 2.3),
                (7.048, -54.5, -59, -58.5, -60.5, 4, 1.5), (7.2193, -46.5, -33.5, -45, -71, -2, 1.5),
                (7.238, -46.5, -31.5, -29, -62, -0.5, 0.64), (7.3003, -22, -19, -16.5, -6, -13, .35),
                (7.307, -45, -15, -10, -40, 1.5, .8), (7.3145, -47, -18, -10, -45, -2.5, 1.31),
                (7.3849, -43, -29.5, -32, -34.5, 8, 1.75), (7.415, -63, -35, -28.5, -37, -5, 2.3),
                (7.4568, -54, -28, -22.5, -35, -12, 1), (7.5752, -63, -40, -37.5, -61, -3, 1.6),
                (8.3415, -53, -37, -54.5, -61.5, -10, .9), (8.4269, -48, -27, -28.5, -60, -13, 1.8),
                (8.4868, -57, -38, -41, -46, -16, 4), (8.541, -49.5, -28, -25, -21, -10.5, 1.4),
                (8.6423, -46, -26.5, -33, -41, -9, 2.2), (8.8244, -41, -30.5, -39.5, -41, -4, 4),
                (8.856, -46, -24.5, -31, -39, -8, 1.1)]
# the wide wall flexes more under a heavy knock than under a glancing one
WALL_DB, WALL_SHARE = 2.5, 0.45  # offset [dB], slope [dB per dB]
# a hard contact cracks, and brings out the overtones
CRACK_DB, OVERTONE_DB = -5, -1.5


def clinks(gold_db=0, blue_db=-1, red_db=-1, knock_db=2, chatter_t60=0.076, build_s=0.0015, buzz_db=-6):
    """Impact excitation: each knock is a short clatter that sets the modes of three nuts ringing."""
    rings, knocks, cracks = np.zeros((3, N))
    build = 1 - np.exp(-RING_TIME / build_s)  # the ring builds up over the first few bounces
    for s, knock, gold, blue, red, hardness, length in CLINK_EVENTS:
        wall = WALL_DB + WALL_SHARE * (knock - gold)
        overtones = hardness + OVERTONE_DB
        crack = np.mean([knock, gold, blue, red]) + hardness + CRACK_DB
        levels = (gold + gold_db, blue + blue_db, red + red_db)
        metal = build * sum(undb(db) * ring(modes, length, wall, overtones, detune=.005, scatter_db=1.5)
                            for modes, db in zip(NUTS, levels))
        chatter = contact(chatter_t60, first=0)
        # nuts that stay in touch buzz against each other, which blurs their partials
        buzz = through(metal, chatter / np.linalg.norm(chatter))
        add(rings, s, metal + undb(buzz_db) * buzz)
        add(knocks, s, undb(knock + knock_db) * contact(chatter_t60, first=0.52))
        add(cracks, s, undb(crack) * chatter)
    return rings + through(knocks, response(KNOCK_COLOUR)) + through(cracks, response(CRACK_COLOUR))


def rock_face(x, echo_db=-21, t60=0.043):
    """Diffuse reflection: the rough wall at arm's length returns a short, weak, decaying scatter."""
    scatter = rng.standard_normal(len(RING_TIME)) * fade(t60) * (RING_TIME > .004)
    return x + undb(echo_db) * through(x, scatter / np.linalg.norm(scatter))


# How unlike the two microphone ports hear each band:
# (frequency [Hz], relative side level [dB] before the trim)
PORT_DIFFERENCE = [(100, -71.5), (500, -45.5), (1000, -49.5), (4000, -47.5), (9000, -29.5), (12500, -0.5)]


def ports(x, side_db=-9):
    """Path difference: two close ports hear nearly the same sound, apart from the highest treble."""
    f = np.maximum(np.arange(N // 2 + 1) * SR / N, 1)
    # a small path difference shows as a part in quadrature
    side = irfft(1j * rfft(x) * undb(side_db + log_interp(f, PORT_DIFFERENCE)), N)
    return np.array([x + side, x - side])


def scene():
    """Superposition: handling noise close in front of the climber's chest, heard at two ports."""
    near_rock = rock_face(clinks() + clicks() + slides() + scrape())
    return ports(near_rock + jangle() + rustle() + body())


def record(dry, hiss_db=-92):
    """Transducer limits: separate faint hisses, clipping of the highest peaks and a 15.2 kHz low-pass."""
    hiss_band = signal.butter(2, [9000, 13000], "band", fs=SR, output="sos")
    hiss = signal.sosfilt(hiss_band, rng.standard_normal((2, N)))
    sound = np.clip(dry + undb(hiss_db) * unit(hiss), -.85, .85)
    low_pass = signal.ellip(8, .2, 70, 15200, fs=SR, output="sos")
    return signal.sosfilt(low_pass, sound)


dry = scene()
out = record(dry)
materialize(out)
```